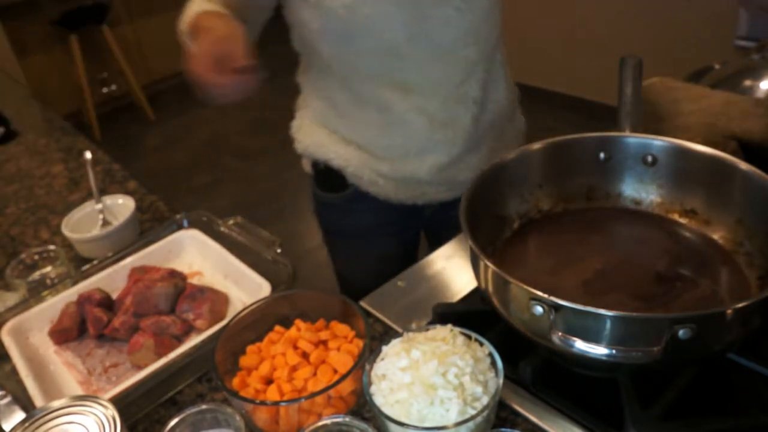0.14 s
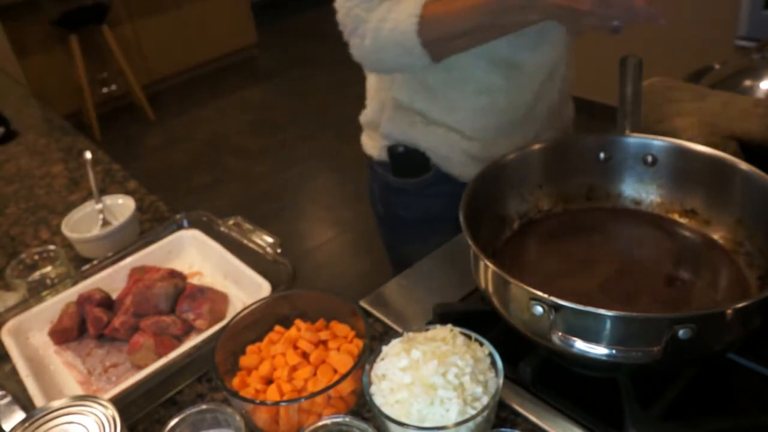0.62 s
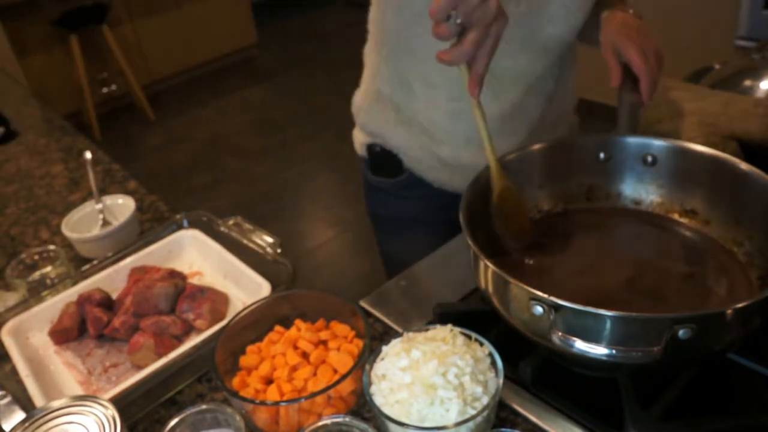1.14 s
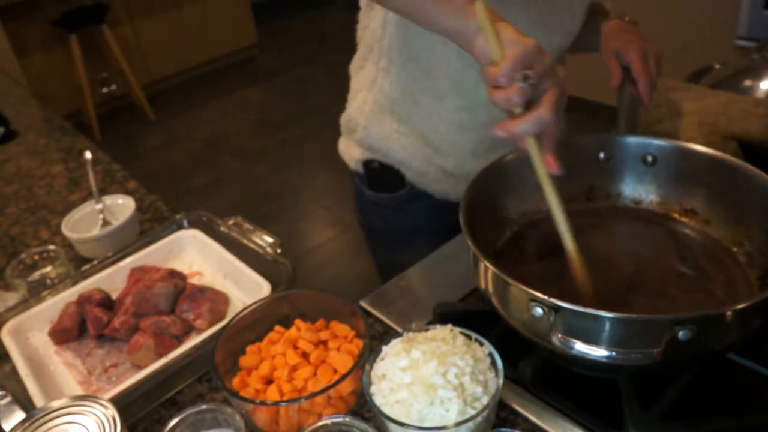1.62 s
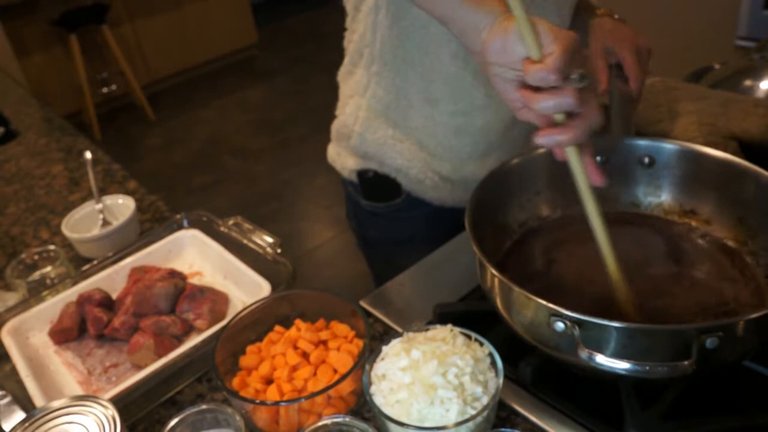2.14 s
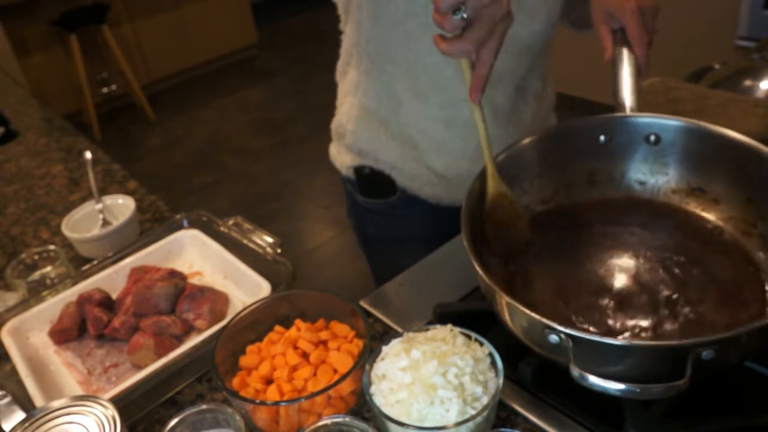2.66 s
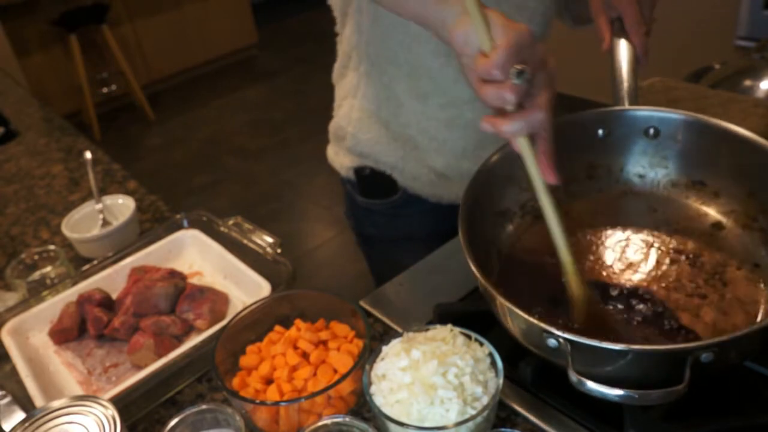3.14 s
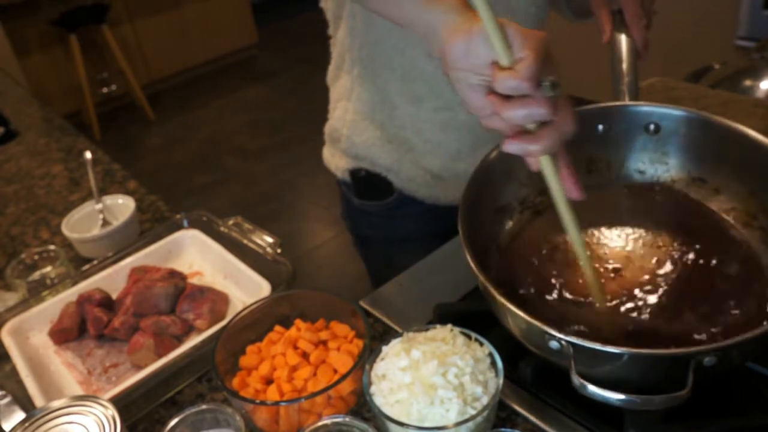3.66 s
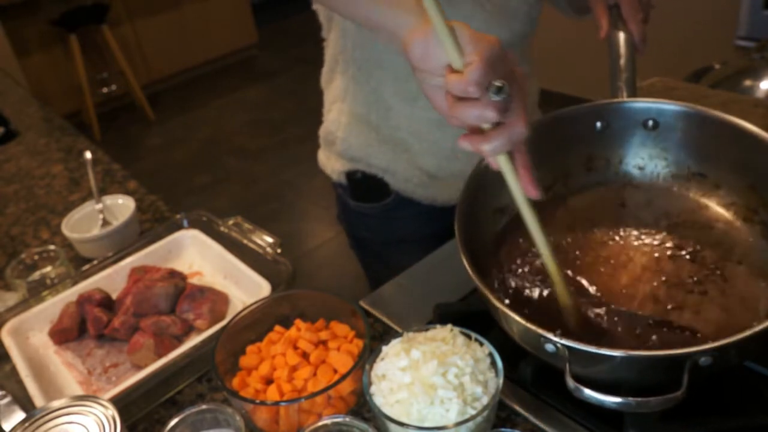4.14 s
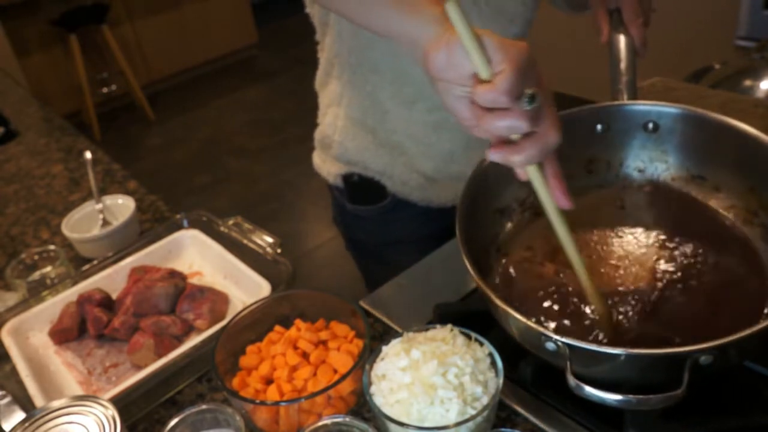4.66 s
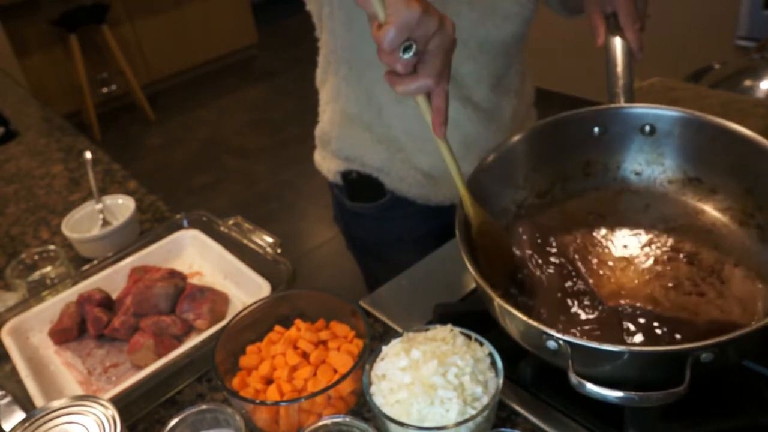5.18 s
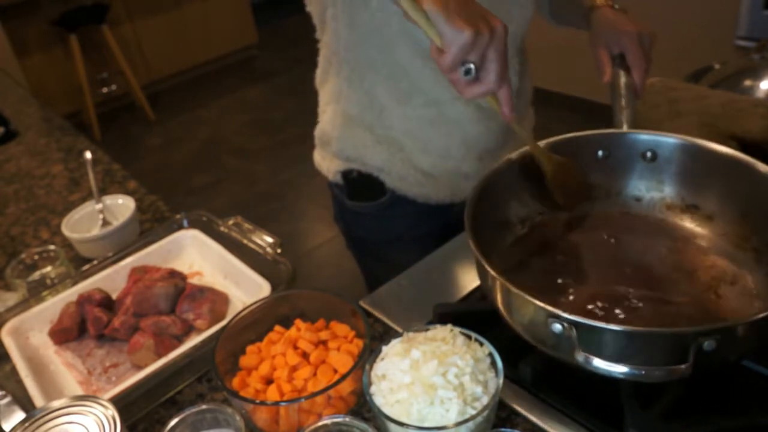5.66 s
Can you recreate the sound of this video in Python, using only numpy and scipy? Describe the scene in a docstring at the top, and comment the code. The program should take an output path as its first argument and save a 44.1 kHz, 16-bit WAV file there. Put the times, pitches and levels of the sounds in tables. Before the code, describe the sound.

Close stereo in a small kitchen, the pan nearer the right, brighter on that side. A gas burner roars softly in the low mids under a fine simmer that slowly weakens. A faint knock and scrape at 0 s, then tiny pops. At 1.05 s the wooden spoon lands with a crack and hollow ring, and a strong bright sizzle flares, with another swell at 1.3 s dying away. Light knocks and scrapes at 1.65 s, a sharp tick and knock at 1.96 s. A loud pop at 2.4 s, then dense hissing bursts at 2.5 and 2.6 s, easing into bubbling fizz around 3 s. From 3.88 to 4.1 s comes the loudest clatter: several ringing pan knocks, ticks and a hard scrape. Quieter rubbing follows, with faint gliding gulps at 4.9 and 5.2 s. Sizzle rises from 5.5 s, peaking around 5.62 s, with a sharp loud pop at 5.68 s.

```python
"""Wine simmers in a hot steel pan, nearer the right ear: clicks and noise are shaped into bubbles and steam.
Each wash of wine onto hot dry metal flashes into a burst of fizz that dies away; single bubbles pop.
A wooden spoon knocks, ticks and scrapes, ringing the pan's modes, and stirs up a few gliding gulps.
Behind it a gas burner roars softly as shaped noise, and the kitchen scatters the spoon's sound."""
import sys
import numpy as np
from scipy import signal
from scipy.fft import rfft, irfft, next_fast_len
from scipy.io import wavfile
from scipy.ndimage import uniform_filter1d

SR = 44100
rng = np.random.default_rng(int(sys.argv[2]) if len(sys.argv) > 2 else 0)


def convert_level_to_amplitude(level_db):
    """Map a level in decibels to its linear amplitude factor."""
    exponent = np.asarray(level_db, float) / 20
    return 10 ** exponent


def store_pcm(level_fs):
    """Save levels as 16-bit WAV."""
    pcm = np.round(np.clip(level_fs, -1, 1) * 32767).astype(np.int16)
    wavfile.write(sys.argv[1], SR, np.atleast_2d(pcm).T)


N = 255275  # length in samples

# Colours of the sizzle: tiny bubbles, larger bubbles, escaping steam and bursting films.
# Each row: frequency in Hz, relative level in dB per Hz.
FIZZ_COLOUR = [(2500, -61.5), (4500, -23.5), (6000, -12), (7900, -1), (8800, -1), (11000, -12),
               (15700, -33)]
BOIL_COLOUR = [(100, -112), (400, -11.5), (700, -14.5), (1000, -2.5), (1600, 1.5), (2500, 2.5), (3500, 1.5),
               (6000, -62), (16000, -61)]
HISS_COLOUR = [(500, -86.5), (2500, -11), (3700, -3), (5000, -0.5), (6200, -1.5), (9000, -7.5),
               (16000, -57.5)]
SPRAY_COLOUR = [(5000, -70), (8000, -30), (10500, -4), (12000, 0), (14000, -9), (15700, -19)]
# Single loud bubbles. Each row: start in seconds, relative level in dB.
POPS = [(0.0873, -22.5), (0.1785, -33), (0.2993, -31), (0.426, -27.5), (0.6623, -23), (0.9333, -44),
        (1.4038, -24.5), (1.589, -26.5), (1.7994, -21), (2.0528, -27), (2.0977, -24.5), (2.142, -31),
        (2.4056, -16.5), (3.3661, -21.5), (3.749, -54.5), (3.8983, -25), (4.36, -27.5), (4.6254, -29.5),
        (4.715, -35), (4.795, -38), (4.8392, -33.5), (4.995, -42), (5.446, -33), (5.675, -13)]
# Wine washes onto hot dry metal and flashes. Each row: peak time in seconds, fizz level in dB,
# rise in seconds, fall in dB per second, coarseness in dB (deeper wine boils in larger bubbles).
FLASHES = [(0.01, -48, 0.059, 60, 13), (1.078, -22, 0.012, 19, -2), (1.27, -25, 0.16, 44, -7),
           (1.6, -35, .3, 15, 3.5), (2.406, -36, 0.095, 154, 3.5), (2.511, -25.5, 0.026, 58, -16),
           (2.602, -23, 0.12, 55, 1), (2.8, -30.5, 0.14, 29.5, 8), (3.0, -28.5, 0.25, 42, 5),
           (3.66, -42.5, 0.29, 57, -13), (3.9, -35, 0.095, 32.5, 8.5), (4.36, -55, 0.086, 36, -7),
           (5.021, -35.5, 0.094, 37, -2), (5.226, -40, 0.19, 77, 6.5), (5.516, -32.5, 0.13, 18, -4.5),
           (5.618, -23, 0.074, 50, -8.5)]
# How boil, steam and spray compare with the fine fizz. Each row: level in dB, share of the coarseness
# it follows, extra dB in the simmer alone, dB per second in later flashes as the pan cools,
# dB for each doubling of the fall (a thin film vanishes fast and steams).
BOIL_LAW = (-14.5, 0.89, 0.1, 0.06, 1)
HISS_LAW = (-8, 0.27, 3.5, 0.65, 2)
SPRAY_LAW = (-15, 0.3, -21, -0.2, -4.5)
# Ringing modes of the pan with wine in it.
# Each row: frequency in Hz, relative level in dB, basic time to fall 60 dB in seconds.
PAN_MODES = [(214, 13, 0.58), (288, -4.5, 0.15), (340, -39, 0.28), (393, 3.5, 0.15), (458.5, -1.5, 0.4),
             (497.6, -5.5, 0.3), (533, -2, 0.17), (614, -28, 0.38), (617.5, -5, 0.08), (689, -3.5, 0.52),
             (768.6, -0.5, 0.15), (838, 1, 0.34), (886, -22.5, 0.55), (961, -7.5, 0.11), (990.6, 8, 0.089),
             (1079.5, -0.5, 0.23), (1173, -1, 0.22), (1368, 7, 0.21), (1456, 0, 0.41), (1680, -2.5, 0.27),
             (1857, -45, 0.065), (1986, -5, 0.11), (2356, 1, 0.26), (2470, -36, 0.24), (2820, 2.5, 0.083),
             (3168, 5, 0.06), (3910, -9, 0.068), (4470, -2, 0.21), (5210, 3.5, 0.13), (6600, -19, 0.08)]
# The bowl of the spoon thumps the pan. Each row is one ring; a blow that rings low and high has two rows.
# Each row: start in seconds, relative level in dB, centre of the ring in Hz,
# ring time as a factor (short where the spoon stays pressed).
KNOCKS = [(0.003, -28, 598, 2.8), (1.047, -30.5, 484, 2.5), (1.047, -31, 1400, .9),
          (1.07, -29.5, 702, 0.31), (1.065, -24.5, 1200, 1), (1.12, -38, 1170, 1.8),
          (1.156, -33.5, 1180, 0.65), (1.224, -34, 1125, 0.86), (1.655, -43.5, 696, 1.6),
          (1.655, -37.5, 1420, 0.21), (1.703, -35, 654, .9), (1.796, -40, 622, 1.8),
          (1.796, -41.5, 1170, 1.6), (1.96, -28.5, 438.3, 1.4), (1.96, -30.5, 1087, 3.3),
          (1.961, -43, 1368, 0.75), (2.01, -29, 492, 1), (2.01, -28, 640, 1.7), (2.055, -35, 1090, 1.7),
          (2.104, -29, 639, 0.94), (2.104, -36.5, 995, 1.2), (3.879, -15, 511, 1), (3.878, -16, 938, 1.4),
          (3.938, -21, 533, 4.1), (3.938, -30.5, 840, 2.1), (4.001, -20.5, 1038, 1.4),
          (4.011, -35, 494, 1.1), (4.011, -22.5, 776, 0.93), (4.037, -17.5, 510, 1.3),
          (4.107, -28.5, 530, 1), (4.459, -36.5, 537, 0.66), (4.459, -46, 825, 0.8),
          (4.501, -38.5, 528, 0.6), (4.598, -51, 540, 1), (4.853, -44, 1133, 0.38), (5.172, -48, 1020, .7),
          (5.666, -44, 444, 1.8), (5.666, -39, 900, 1.5)]
# The spoon's hard edge ticks on the steel. Each row: start in seconds, relative level in dB,
# centre of the ring in Hz, share of broad crack from 0 to 1.
TICKS = [(1.048, -18, 2820, 0.99), (1.051, -20.5, 4700, 0.05), (1.2224, -35, 5840, 0.4),
         (1.6555, -24.5, 4100, 0.74), (1.9601, -12.5, 3880, 0.39), (2.3082, -31.5, 5270, 0.3),
         (2.5032, -18, 5200, 0), (3.8761, -13.5, 2000, 0.47), (3.9, -17.5, 3280, 0.57),
         (4, -25.5, 3170, 0.5), (4.0382, -17.5, 1950, 0.2)]
# The spoon drags over the bottom. Each row: peak time in seconds, relative level in dB,
# rise in seconds, fall in dB per second, centre of the rumble in Hz.
STROKES = [(0.02, -30.5, 0.044, 148, 660), (1.08, -32.5, .03, 50, 635), (1.31, -36.5, 0.17, 83, 840),
           (1.67, -32, 0.026, 83, 520), (1.89, -45, 0.038, 201.5, 660), (1.99, -28.5, 0.044, 72, 690),
           (2.33, -43, .1, 27, 940), (2.95, -42, 0.11, 2, 1040), (3.32, -43.5, 0.13, 300, 790),
           (3.949, -12, 0.062, 133, 564), (4.03, -27.5, .04, 200, 990), (4.08, -21.5, .06, 110, 534),
           (4.44, -42, 0.043, 140, 522), (4.86, -43, .04, 6, 670), (5.08, -50, 0.34, 77, 660),
           (5.7, -36, .04, 3, 536)]
# Wine gulps behind the spoon. Each row: start in seconds, level in dB,
# first pitch in Hz, last pitch in Hz (both before a small wobble), length in seconds.
GULPS = [(4.875, -46, 600, 870, 0.066), (5.17, -51, 475, 680, 0.031), (5.205, -50, 606, 458, 0.057)]
# Colour of the gas jets and room air. Each row: frequency in Hz, relative level in dB per Hz.
FLAME_COLOUR = [(12, -83), (20, -47), (86, -29), (114, -30), (382, -15.5), (431, -11.5), (458, -11.5),
                (620, -3.5), (790, -13), (948, -10), (1210, -19.5), (1390, -16), (2500, -36), (3250, -32),
                (5500, -120)]
# How alike left and right are. Each row: frequency in Hz, likeness from 0 to 1.
LIKENESS = [(60, 0.52), (130, 0.94), (290, 1.0), (640, 0.97), (1410, 0.44), (3100, 0.09), (6820, 0.51),
            (15000, 0.3)]
# Balance of the two sides. Each row: frequency in Hz, left gain minus right gain in dB.
LEFT_BALANCE = [(300, 0), (1300, -0.5), (2400, -3), (4400, -7.5), (8100, -10.5), (15000, -3)]
# Phase between the sides. Each row: frequency in Hz, radians by which left leads.
LEFT_LEAD = [(0, 0), (2410, -0.0), (4390, -5.4), (8960, -6.4), (12000, -7.4), (13900, -1.4), (15200, 0.8)]

# The steady simmer fades as the pan cools.
SIMMER_DB, COOLING_DB_PER_S, SIMMER_COARSE_DB = -42.5, 1.7, -2.5
FLICKER_DB, FLICKER_S = 1.05, 0.045  # each part of the sizzle wavers on its own
RISE_DB = 14.5  # a flash or a stroke climbs this far during its rise
LIFT_DB_PER_S = 250  # extra fall of a stroke once the next one has peaked
FLAME_DB = -53.5


def boiling():
    """Gains of fizz, boil, steam and spray: the simmer plus every flash, added in power."""
    laws = np.array([(0, 0, 0, 0, 0), BOIL_LAW, HISS_LAW, SPRAY_LAW])  # fizz is the reference
    base_db, share, simmer_db, drift_db, film_db = laws.T[:, :, None]
    simmer = convert_level_to_amplitude(SIMMER_DB - COOLING_DB_PER_S * np.arange(N) / SR)
    power = (convert_level_to_amplitude(base_db + share * SIMMER_COARSE_DB + simmer_db) * simmer) ** 2
    for peak_s, db, rise_s, fall, coarse_db in FLASHES:
        thinness = np.log2(abs(fall) / 30)  # doublings of the fall above 30 dB per second
        part_db = base_db + share * coarse_db + drift_db * peak_s + film_db * thinness
        power = power + (convert_level_to_amplitude(part_db) * surge(peak_s, db, rise_s, fall)) ** 2
    flicker = uniform_filter1d(rng.standard_normal((4, N)), size=max(round(FLICKER_S * SR), 1), axis=1)
    return np.sqrt(power) * convert_level_to_amplitude(FLICKER_DB * evened(flicker))


def surge(peak_s, db, rise_s, fall_db_per_s):
    """Gain that climbs to a peak and dies away steadily in dB."""
    t = np.arange(N) / SR - peak_s
    u = np.minimum(t, 0) / max(rise_s, .005)
    climb_db = RISE_DB * (u - np.maximum(-u - 1, 0) ** 2)  # even steeper before the rise begins
    return convert_level_to_amplitude(db + climb_db - abs(fall_db_per_s) * np.maximum(t, 0))


def sizzle(gains, snap):
    """Bubbles burst and steam escapes; the boil shakes the pan, and a loud pop is a snap and a short spit."""
    fizz, bubbling, hiss, spray = gains
    pops = single_pops(snap)
    fine = fizz * bursts(per_s=3100, spread_db=4.0, hush=0.77) + 1.65 * pops
    coarse = bubbling * bursts(per_s=1400, spread_db=5.0, hush=0.86) + 0.17 * pops
    finest = spray * bursts(per_s=1900, spread_db=8.0, hush=0.62) + 0.039 * pops
    steam = hiss * bursts(per_s=3000, spread_db=4.5, hush=0.62) + .5 * pops
    boil = colour(coarse, BOIL_COLOUR) + colour(steam, HISS_COLOUR)
    steel = sum(convert_level_to_amplitude(db - 32.5) * ring(boil, hz, t60) for hz, db, t60 in PAN_MODES if hz > 2000)
    bubbles = colour(fine, FIZZ_COLOUR) + boil + colour(finest, SPRAY_COLOUR)
    return patchy(bubbles, depth_db=2.0) + steel


def single_pops(snap):
    """Each loud bubble is one click, the snap, with a short dying spit of noise."""
    pops, t = np.zeros(N + 800), np.arange(800) / SR
    for (s, db), spit in zip(POPS, rng.standard_normal((len(POPS), 800))):
        pops[round(s * SR):][:800] += convert_level_to_amplitude(db) * (snap * (t == 0) + .4 * spit * convert_level_to_amplitude(-60 * t / 0.02))
    return pops[:N]


def bursts(per_s, spread_db, hush):
    """Clicks of very unequal size over a hush of countless small ones, coming in clumps."""
    clumps = convert_level_to_amplitude(0.82 * evened(uniform_filter1d(rng.standard_normal(N), size=500)))
    size = convert_level_to_amplitude(spread_db * np.minimum(rng.exponential(1, N), 5)) * rng.choice([-1., 1.], N)
    clicks = evened(size * (rng.random(N) < per_s / SR))
    return evened(clumps * (hush * rng.standard_normal(N) + (1 - hush) * clicks))


def patchy(x, depth_db):
    """The boiling spots wander, so patches of the spectrum swell and fade."""
    z = signal.stft(x, nperseg=512, noverlap=384)[2]
    patches = uniform_filter1d(rng.standard_normal(z.shape), size=4, axis=0)  # across frequency
    patches = uniform_filter1d(patches, size=24, axis=1)  # across time
    return signal.istft(z * convert_level_to_amplitude(depth_db * evened(patches)), nperseg=512, noverlap=384)[1][:N]


def knocks():
    """Soft wood swells the pan's modes within a few milliseconds; the next contact damps them."""
    hz, t, out = np.transpose(PAN_MODES)[0, :, None], np.arange(SR // 2) / SR, np.zeros(N + SR)
    turns = rng.random((len(KNOCKS), len(PAN_MODES), 1))  # starting phases
    shake = rng.standard_normal((len(KNOCKS), 4000))
    contacts = np.sort([row[0] for row in KNOCKS] + [N / SR])
    swell = np.sin(np.pi / 2 * np.clip(t / .005, 0, 1)) ** 2
    for (s, db, centre_hz, lasting), turn, chatter in zip(KNOCKS, turns, shake):
        gap = contacts[contacts > s + .005][0] - s  # seconds to the next contact
        modes = struck(near(hz, centre_hz, 0.043), turn, t, max(lasting, .1))
        modes = modes + struck(0.27 * near(hz, centre_hz, 0.43), turn, t, lasting=0.44)  # wider neighbours
        force = (t[:4000] == 0) + 0.017 * chatter * convert_level_to_amplitude(-60 * t[:4000] / 0.26)
        blow = signal.oaconvolve(modes * swell, force)[:len(t)]
        damping_db = 5.6 * np.clip((t - gap) / 0.0095, 0, 1)
        out[round(s * SR):][:len(t)] += blow * convert_level_to_amplitude(db - damping_db)
    return out[:N]


def ticks():
    """The spoon's hard edge gives a sharp bright crack and a brief high ring."""
    hz, t, out = np.transpose(PAN_MODES)[0, :, None], np.arange(8000) / SR, np.zeros(N + SR)
    bright = signal.butter(2, [2400, 6500], "band", fs=SR, output="sos")
    for (s, db, centre_hz, share), noise in zip(TICKS, rng.standard_normal((len(TICKS), 8000))):
        crack = signal.sosfilt(bright, noise * (convert_level_to_amplitude(-60 * t / 0.0042) + 0.27 * convert_level_to_amplitude(-60 * t / 0.12)))
        drive = near(hz, centre_hz, 0.1) + 0.35 * share * near(hz, 3120, .5)
        ringing = struck(drive, 0, t, lasting=0.35)
        out[round(s * SR):][:8000] += convert_level_to_amplitude(db) * (2.9 * share * crack + 0.56 * ringing)
    return out[:N]


def scrape():
    """Gritty slips of wood on steel ring the modes around the spot each stroke rubs."""
    strokes = np.array([surge(*row[:4]) for row in STROKES])
    centre_hz = np.transpose(STROKES)[4]
    next_s = np.append(np.transpose(STROKES)[0, 1:], N / SR)[:, None]
    strokes = strokes * convert_level_to_amplitude(-LIFT_DB_PER_S * np.maximum(np.arange(N) / SR - next_s, 0))
    grit = bursts(per_s=400, spread_db=5.5, hush=0.43)
    out = np.zeros(N)
    for hz, db, t60 in PAN_MODES:
        rub = grit * (near(hz, centre_hz, 0.41) @ strokes)
        out += convert_level_to_amplitude(db - 20.5) * ring(rub, hz, 0.88 * t60)  # the pressing spoon damps the ring
    return out


def gulps():
    """An air pocket rings while it closes or opens, so its pitch glides."""
    out = np.zeros(N)
    for s, db, first_hz, last_hz, length in GULPS:
        n = round(length * SR)
        wobble = 1 + 0.35 * uniform_filter1d(rng.standard_normal(8000), size=200)[:n]
        turns = np.cumsum(np.linspace(first_hz, last_hz, n) * wobble) / SR
        out[round(s * SR):][:n] += convert_level_to_amplitude(db) * np.sin(2 * np.pi * turns) * signal.windows.tukey(n, .6)
    return out


def near(hz, centre_hz, octaves):
    """How strongly a spot on the pan drives a mode."""
    return np.exp(-.5 * (np.log2(hz / centre_hz) / octaves) ** 2)


def struck(drive, turn, t, lasting):
    """The pan's modes as dying sines, each as strong as the struck spot drives it."""
    hz, db, t60 = np.transpose(PAN_MODES)[:, :, None]
    return (drive * convert_level_to_amplitude(db - 60 * t / (lasting * t60)) * np.sin(2 * np.pi * (hz * t + turn))).sum(0)


def ring(x, hz, t60):
    """One mode of the pan driven by a force; noise passes at about its own level."""
    r = convert_level_to_amplitude(-60 / t60 / SR)
    w = 2 * np.pi * hz / SR
    return signal.lfilter([np.sqrt(4 * (1 - r)) * np.sin(w)], [1, -2 * r * np.cos(w), r * r], x)


def flame():
    """The burner roars softly: coloured noise that flutters a little."""
    flutter = convert_level_to_amplitude(0.5 * evened(uniform_filter1d(rng.standard_normal(N), size=3000)))
    return convert_level_to_amplitude(FLAME_DB) * evened(colour(flutter * rng.standard_normal(N), FLAME_COLOUR))


def room(x, t60, start_s):
    """Three echo tails take turns in a steady cycle, so the echo keeps changing."""
    turn = np.pi * 3.1 * np.arange(N) / SR
    out = np.zeros(N)
    for k in range(3):
        share = np.sqrt(2 / 3) * np.cos(turn + k * np.pi / 3)
        out += signal.oaconvolve(x * share, tail(t60, start_s))[:N]
    return out


def tail(t60, start_s):
    """Sparse reflections of random sign fade in, then die away, with a total energy of 1."""
    taps = np.zeros(SR // 2)
    at = np.arange(0, len(taps) - 12, 12)
    at = at + rng.integers(0, 12, len(at))
    fade = convert_level_to_amplitude(-60 * at / SR / t60) * np.clip(at / SR / start_s, 0, 1)
    taps[at] = rng.choice([-1., 1.], len(at)) * fade
    return taps / np.linalg.norm(taps)


def colour(x, spectrum):
    """Shapes a sound with a filter of the given spectrum and unit energy that never acts ahead of time."""
    gain_db = np.maximum(read(spectrum, abs(np.fft.fftfreq(8192, 1 / SR))), -100)
    log_gain = np.log(convert_level_to_amplitude(gain_db))
    taps = np.fft.ifft(np.exp(np.conj(signal.hilbert(log_gain)))).real[:4096]  # minimum phase
    return signal.oaconvolve(x, taps / np.linalg.norm(taps))[:len(x)]


def read(points, hz):
    """Reads a curve between its points on a log-frequency axis."""
    f, value = np.transpose(points)
    return np.interp(np.log(hz + 1), np.log(f + 1), value)


def evened(x):
    """Scales to an average (rms) level of 1."""
    return x / np.sqrt(np.mean(x ** 2) + 1e-20)


def scene():
    """The right side faces the pan; the left is shadowed and hears more scattered sound."""
    blows = knocks()
    # the pan is too small to radiate bass
    no_bass = signal.butter(3, 200, "high", fs=SR, output="sos")
    spoon = signal.sosfilt(no_bass, blows + ticks() + scrape() + gulps())
    gains = boiling()
    # squaring favours the hardest blows, which shake the counter
    low_band = signal.butter(2, [30, 170], "band", fs=SR, output="sos")
    thud = signal.sosfilt(low_band, blows ** 2 * rng.standard_normal(N))
    spoon = spoon + convert_level_to_amplitude(3.0) * thud
    right = sizzle(gains, snap=0.56) + flame() + spoon + convert_level_to_amplitude(-5.5) * room(spoon, t60=0.54, start_s=0.012)
    scattered = sizzle(gains, snap=0.26) + flame() + room(spoon, t60=0.34, start_s=0.0038)
    # left is partly the right sound, shifted in phase, and partly scattered sound
    size = next_fast_len(N)
    hz = np.fft.rfftfreq(size, 1 / SR)
    same = np.clip(read(LIKENESS, hz), 0, 1)
    lead = np.exp(1j * np.interp(hz, *np.transpose(LEFT_LEAD)))
    right = rfft(right, size)
    left = same * lead * right + np.sqrt(1 - same ** 2) * rfft(scattered, size)
    balance = convert_level_to_amplitude(read(LEFT_BALANCE, hz) / 2)  # half on each side
    # side walls reach the two sides with opposite sign
    walls = convert_level_to_amplitude(-18) * room(spoon, t60=0.14, start_s=0.0099) * np.array([[1], [-1]])
    return np.array([irfft(left * balance, size)[:N], irfft(right / balance, size)[:N]]) + walls


def roll_off(x):
    """The treble ends steeply here."""
    return signal.sosfilt(signal.butter(12, 15710, fs=SR, output="sos"), x)


def record(dry):
    """Turns the finished mix into the final sound."""
    return roll_off(dry)


dry = scene()
out = record(dry)
store_pcm(out)
```